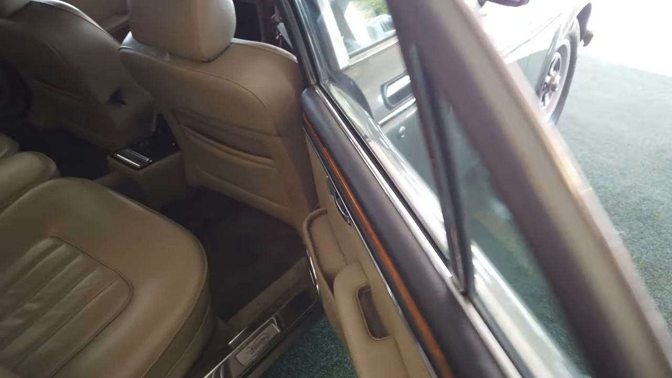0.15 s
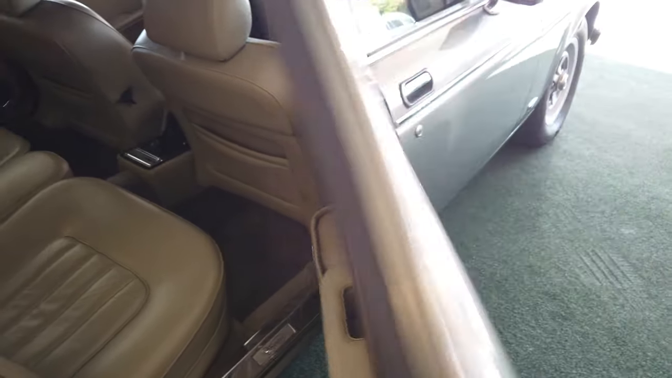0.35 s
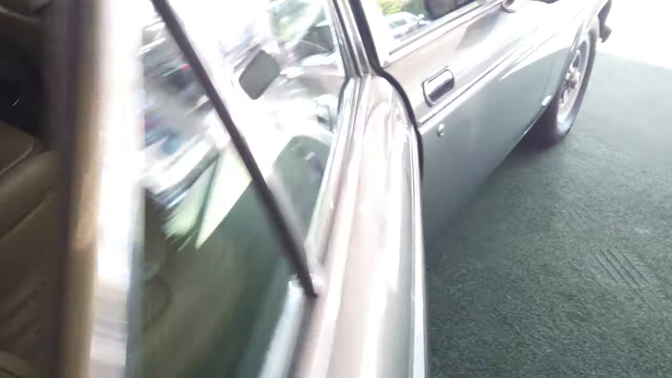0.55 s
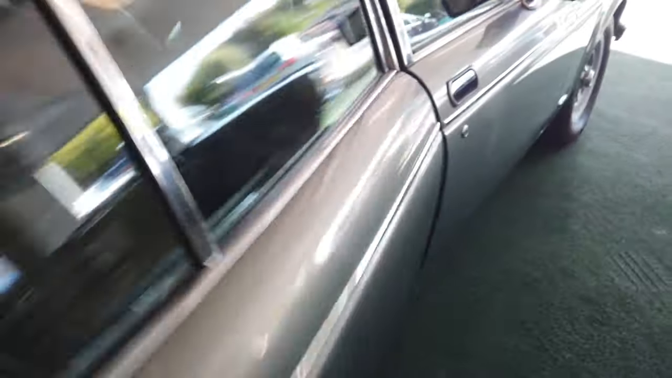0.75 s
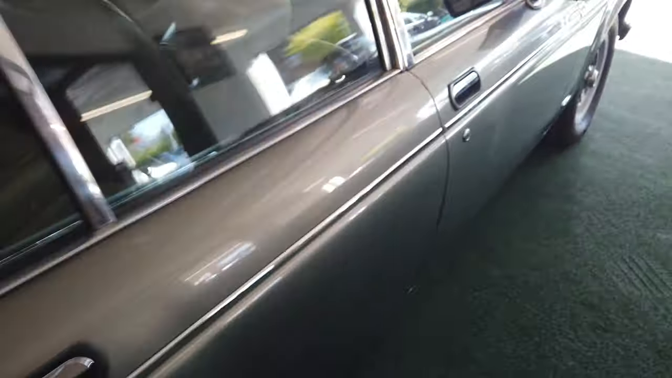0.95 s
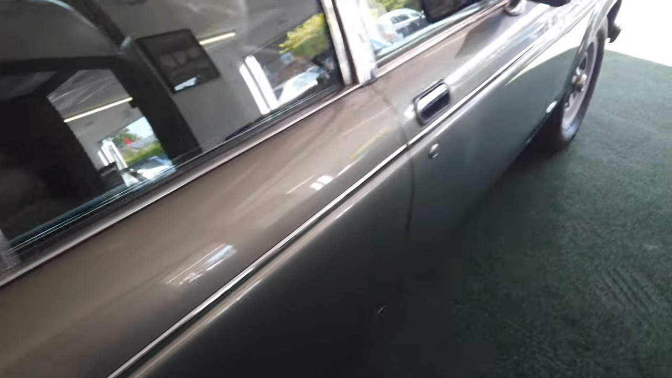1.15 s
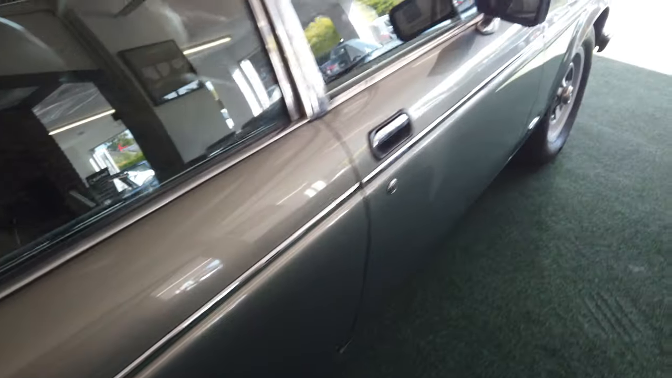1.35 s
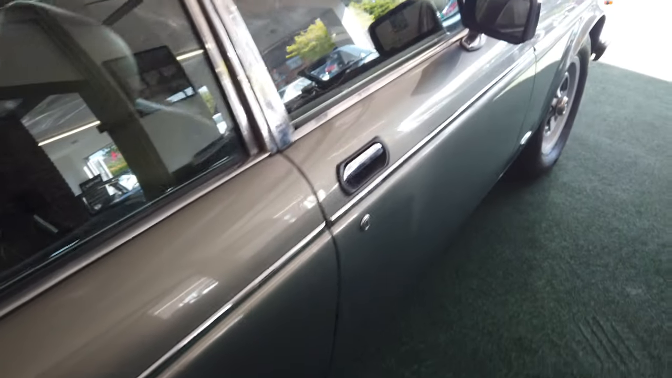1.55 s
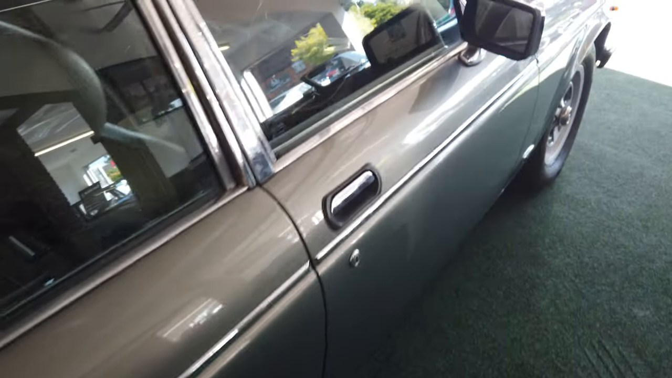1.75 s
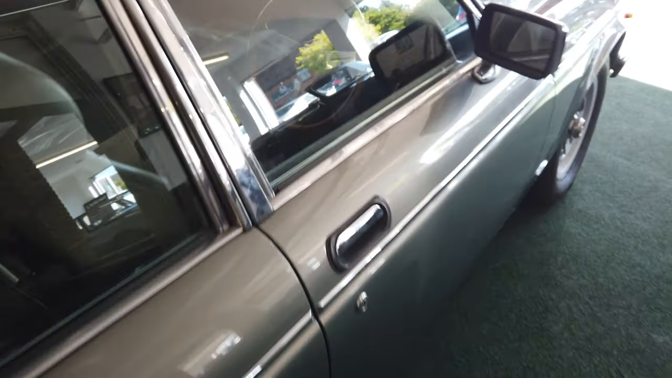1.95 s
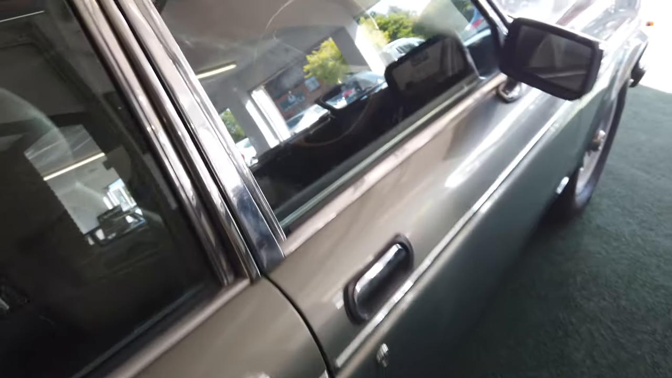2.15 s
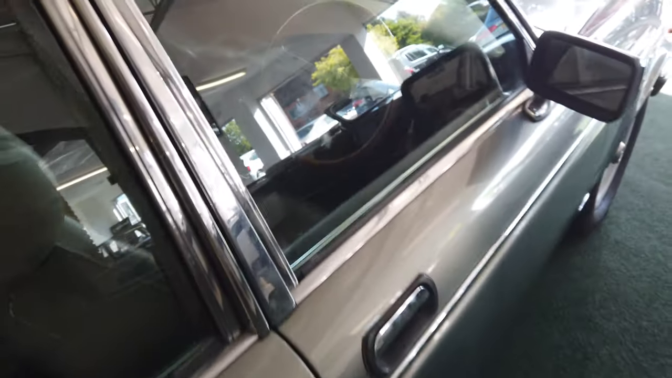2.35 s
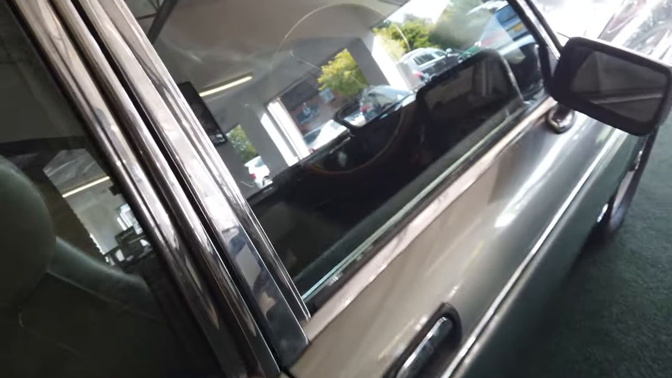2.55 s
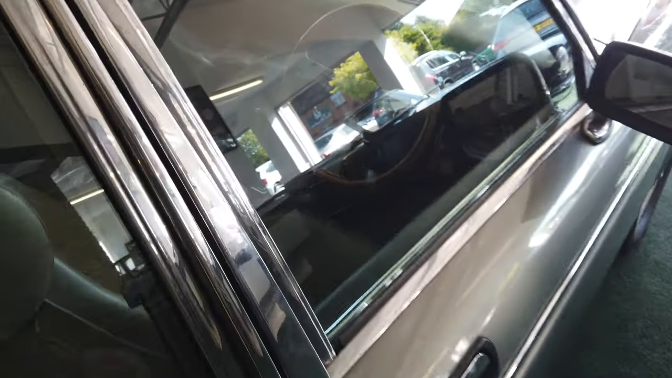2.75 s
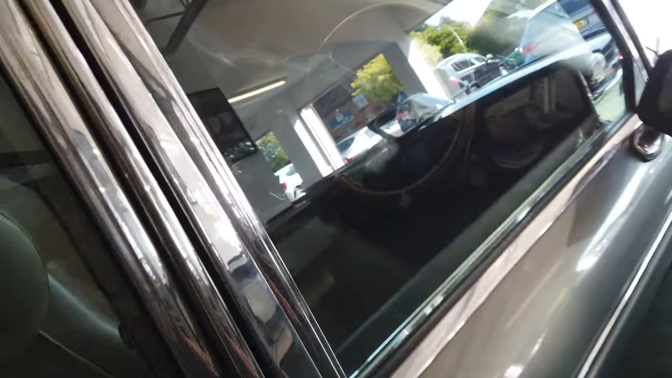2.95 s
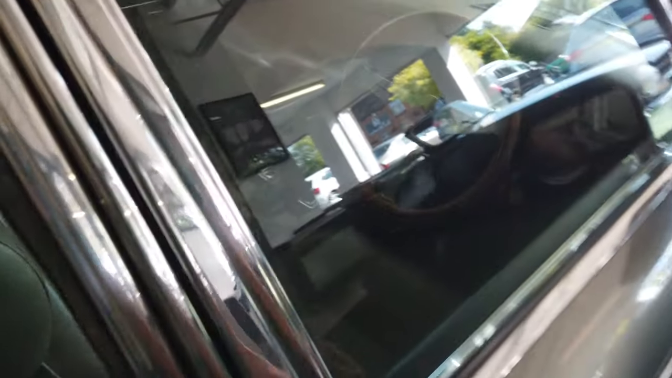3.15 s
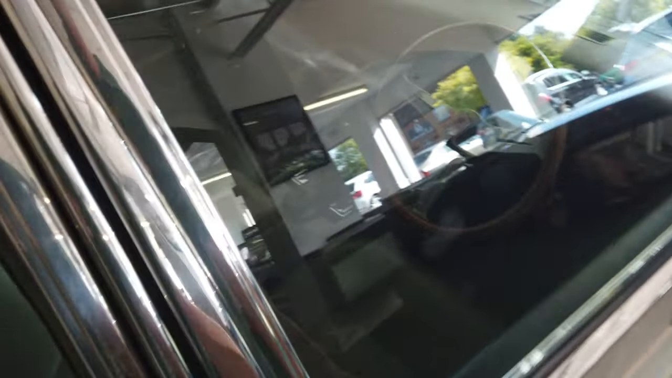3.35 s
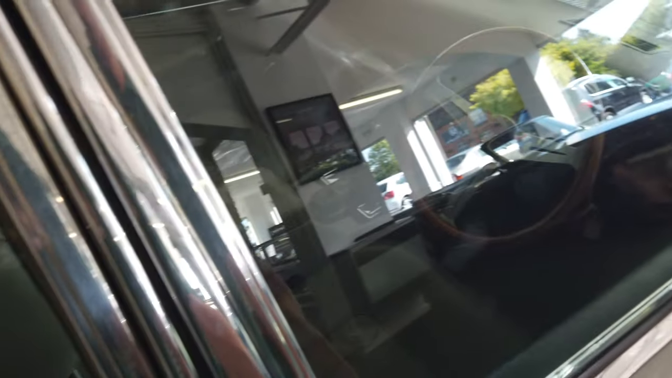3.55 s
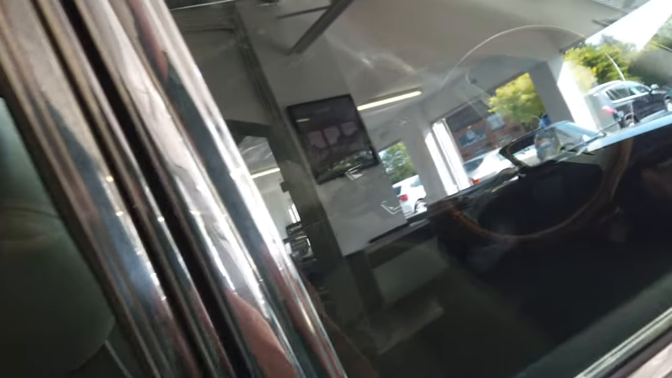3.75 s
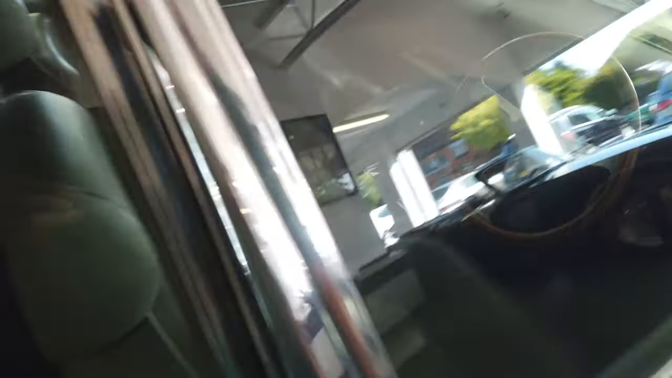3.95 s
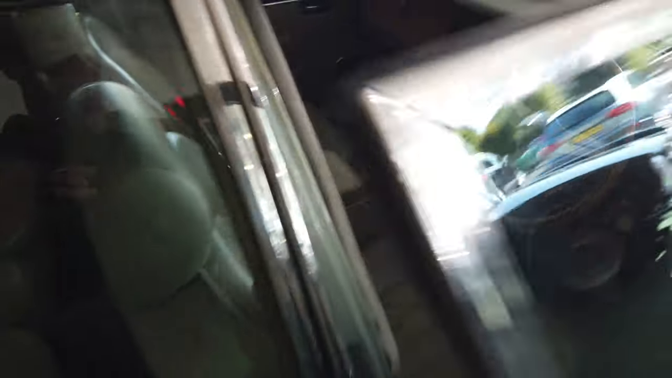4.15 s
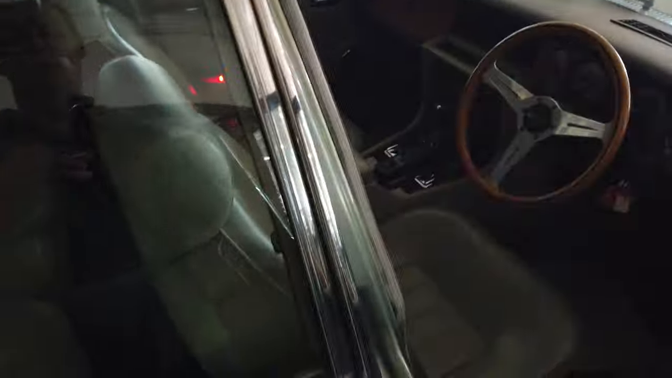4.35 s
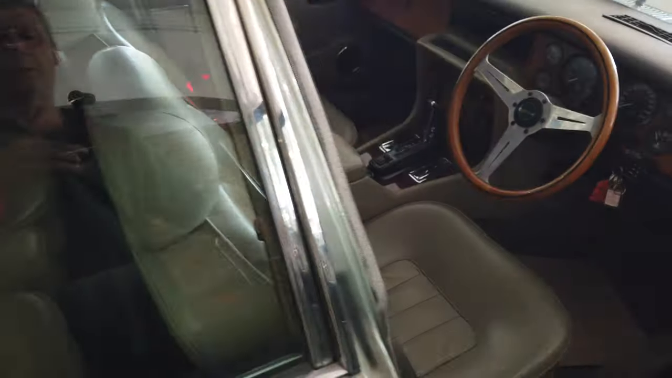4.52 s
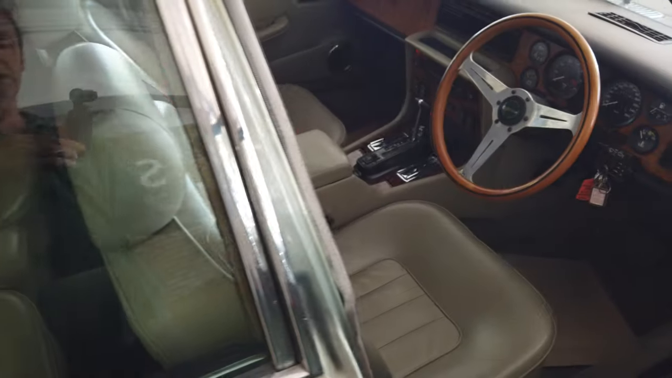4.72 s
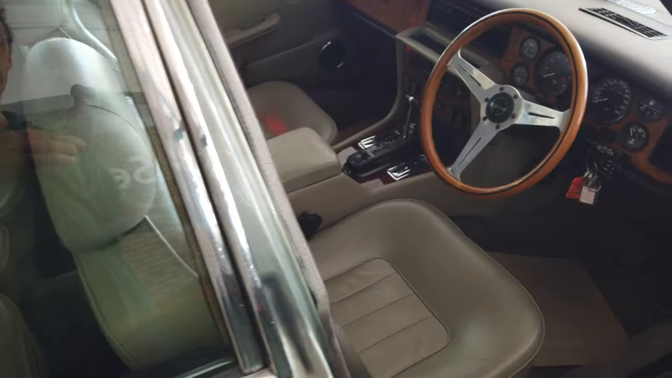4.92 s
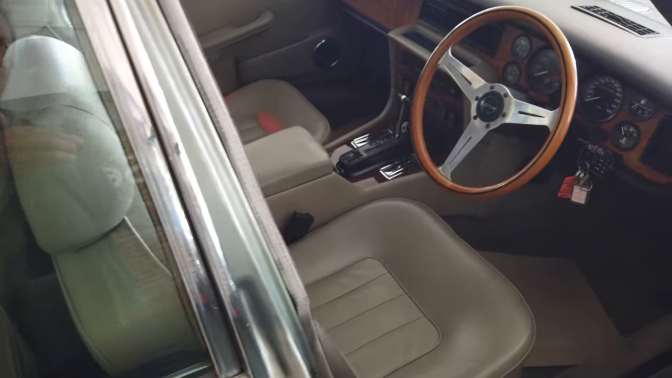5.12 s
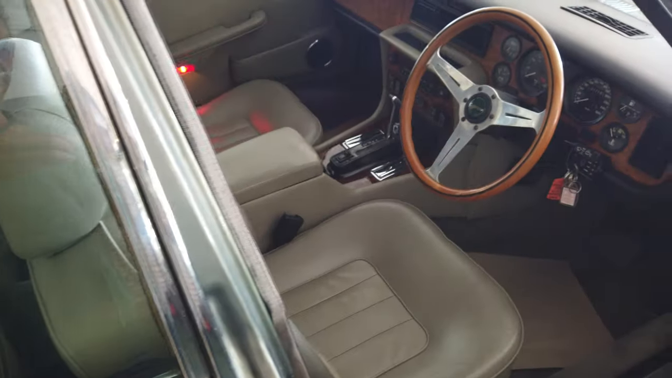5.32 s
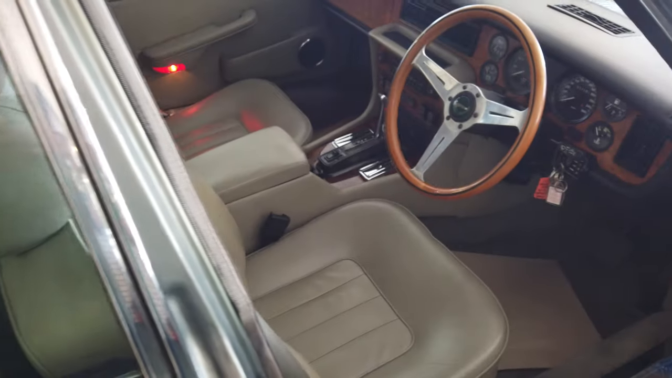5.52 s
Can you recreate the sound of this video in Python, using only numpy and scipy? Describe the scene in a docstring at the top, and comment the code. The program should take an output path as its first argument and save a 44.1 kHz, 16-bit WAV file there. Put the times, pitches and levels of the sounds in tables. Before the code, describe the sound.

A heavy old car door slams with a snap, deep thunk and singing steel, then a handle clicks and another door opens with a squeak and clunk.

```python
"""The heavy rear door of an old saloon car swings shut in a covered showroom: latch snaps, door lands on its seals,
cabin booms, steel rings on. The front handle is pulled, that latch springs free, and the door opens until its check
arm squeaks and drops into the notch; a sleeve rustles over ventilation and far traffic. Contacts are decaying noise
bursts coloured per part, with resonances for ringing metal; the boom is rounded pushes into decaying modes; friction
is filtered noise under swells. Shaped noise echoes make the room; small delays and ragged phase place the sources."""
import sys
import numpy as np
from scipy import signal
from scipy.fft import rfft, irfft, next_fast_len
from scipy.io import wavfile
from scipy.ndimage import uniform_filter1d

SR = 44100
rng = np.random.default_rng(int(sys.argv[2]) if len(sys.argv) > 2 else 0)


def transcribe(u):
    """Save the signal u as a 16-bit wav file named by the first command-line argument.

    u: samples, shape (n,) or (channels, n), limited to [-1, 1]; the rate is SR.
    q: integer samples, one column per channel.
    """
    v = np.clip(np.atleast_2d(u).T, -1, 1)
    q = np.round(v * 32767).astype(np.int16)
    wavfile.write(sys.argv[1], SR, q)


N = 246254
TIME = np.arange(N) / SR
BLOW_SIZE = 16384   # samples

# Hand, seal and the door's own weight meeting the body.
# Each row: time in seconds, push level in dB, contact time in seconds.
BUMPS = [(.634, -26, 0.0028), (.672, -24.5, 0.0041), (1.044, -22, 0.0069), (1.079, -5.5, 0.014),
         (1.121, -3, 0.01), (1.156, 4, 0.0031), (1.1702, -9, 0.003), (1.1927, -5, 0.0026),
         (3.662, -42, 0.002), (3.695, -32.5, 0.0025), (3.777, -16, 0.0052), (4.21, -19, 0.018),
         (4.568, -22.5, 0.014), (4.611, -29.5, 0.0043), (5.022, -27, .011), (5.07, -28.5, 0.0096)]


def from_db(db):
    """Decibels to gain."""
    return 10 ** (np.asarray(db) / 20)


def unit(x):
    """Scale to energy 1."""
    return x / np.sqrt(np.sum(x ** 2) + 1e-20)


def rms_one(x):
    """Scale to rms 1."""
    return x / np.sqrt(np.mean(x ** 2) + 1e-20)


def at_hz(points, hz):
    """Read a table on a log-frequency axis."""
    f, value = np.transpose(points)
    return np.interp(np.log(np.maximum(hz, 1)), np.log(f), value)


def fade(t, t60):
    """Free decay, 60 dB down after t60 seconds."""
    return np.exp(-np.log(1000) * t / max(t60, 1e-3))


def swell(start_s, db, attack_s, hold_s, t60):
    """Envelope: a smooth rise, a hold, a free decay."""
    t = TIME - start_s
    rise = np.sin(np.pi / 2 * np.clip(t / attack_s, 0, 1)) ** 2
    return from_db(db) * rise * fade(np.maximum(t - attack_s - hold_s, 0), t60)


def add(track, s, sound):
    """Mix a sound into a track at time s."""
    at = round(s * SR)
    track[at:at + len(sound)] += sound[:N - at]


def causal(gain):
    """Minimum-phase response with the given gain per frequency."""
    cepstrum = irfft(np.log(gain))
    half = len(cepstrum) // 2
    cepstrum[1:half] *= 2
    cepstrum[half + 1:] = 0
    return np.exp(rfft(cepstrum))


def colour(x, spectrum):
    """Minimum-phase filter from a table of (Hz, dB)."""
    size = 2 * next_fast_len(x.shape[-1] // 2 + 1)
    gain = from_db(at_hz(spectrum, np.fft.rfftfreq(size, 1 / SR)))
    return irfft(rfft(x, size) * causal(gain))[..., :x.shape[-1]]


def resonance(x, hz, width_hz):
    """Two-pole band-pass."""
    r = np.exp(-np.pi * width_hz / SR)
    return signal.lfilter([1, 0, -1], [1, -2 * r * np.cos(2 * np.pi * hz / SR), r * r], x)


def soften(x, dull_hz):
    """A soft contact loses its top: second-order low-pass."""
    return signal.sosfilt(signal.butter(2, min(dull_hz, SR / 2 - 1000), fs=SR, output="sos"), x)


def modes(table):
    """Response of a set of decaying modes to one blow."""
    t = TIME[:3 * SR]
    return sum(from_db(db) * np.sin(2 * np.pi * hz * t) * fade(t, t60) for hz, db, t60 in table)


def blow(t60, crack, rise_s=0.00053):
    """A contact, then the dense, quickly dying modes of a damped panel: a noise burst with its spectrum levelled."""
    t = TIME[:BLOW_SIZE]
    burst = unit(rng.standard_normal(BLOW_SIZE) * fade(t, t60) * (1 - np.exp(-t / rise_s)))
    burst[0] -= crack
    spectrum = rfft(burst)
    smooth_power = uniform_filter1d(np.abs(spectrum) ** 2, size=90)
    return irfft(spectrum * causal(smooth_power ** -.5))


def ping(hz, nominal_width_hz, t60, crack=0.09, skirt=1):
    """A blow heard through one resonance; a wider skirt lets it speak at once; energy 1."""
    narrow = resonance(blow(t60, crack), hz, 0.68 * nominal_width_hz)
    return unit(resonance(narrow, hz, 0.68 * skirt * nominal_width_hz))


def with_ring(hits, t60, drag=0):
    """Give each hit its ring time: t60 for the hardest, longer for lighter ones by drag dB per dB of softness."""
    db = np.array(hits)[:, 1]
    return np.c_[hits, t60 * from_db(drag * (db.max() - db))]


def strikes(hits, part, crack, ripple_db=1.0):
    """Blows on one part share its colour and fine treble resonances; softer contacts lose their top."""
    out = np.zeros(N)
    hz = np.geomspace(20, 16000, num=1400)
    ripple = ripple_db * rng.standard_normal(len(hz)) * np.minimum(hz / 4000, 1)
    resonant = np.c_[hz, at_hz(part, hz) + ripple]
    for s, db, dull_hz, t60 in hits:
        struck = colour(blow(t60, crack), resonant)
        add(out, s, from_db(db) * unit(soften(struck, dull_hz)))
    return out


def ringing(hits, rings, skirt=4):
    """Every blow on a part sets its main modes ringing."""
    out = np.zeros(N)
    for s, db, dull_hz, *_ in hits:
        ring = sum(from_db(mode_db) * ping(hz, width_hz, t60, crack=0.22, skirt=skirt)
                   for hz, mode_db, width_hz, t60 in rings)
        add(out, s, from_db(db) * soften(ring, dull_hz))
    return out


def partials(table, flutter_hz=7, steady=0.51, start_s=0):
    """Steel partials: steady sines plus narrow noise, each fluttering on its own; sines in step at start_s."""
    out = 0
    for hz, db in table:
        narrow = resonance(rng.standard_normal(N), hz, 2 * flutter_hz)
        flutter = rms_one(resonance(narrow, hz, 8 * flutter_hz))
        tone = steady * np.sin(2 * np.pi * hz * (TIME - start_s))
        out = out + from_db(db) * rms_one(flutter + tone)
    return out


def grain(level_db, size):
    """Uneven friction: random gain, smoothed over size samples, with level_db rms variation."""
    return from_db(level_db * rms_one(uniform_filter1d(rng.standard_normal(N), size=size)))


def diffuse(size, widths):
    """Noise from all around: the table of (Hz, side-mid dB) sets how far the microphones differ."""
    mid, side = rng.standard_normal((2, size))
    width = from_db(at_hz(widths, np.fft.rfftfreq(size, 1 / SR)))
    return irfft((rfft(mid) + rfft(side) * width * [[1], [-1]]) / np.sqrt(1 + width ** 2), size)


def background():
    """Ventilation and far traffic as shaped noise with a low drone and faint fan tones; the level sways slowly."""
    # Each row: Hz, dB.
    air_colour = [(20, 0), (34, -6.5), (50, 1.5), (75, -7.5), (110, -16), (200, -19.5), (400, -28.5),
                  (800, -29), (1600, -30), (3200, -36), (6400, -44), (11500, -45), (15000, -57)]
    # Each row: Hz, side-mid level in dB.
    air_width = [(60, -18.5), (250, -12.5), (550, -8.5), (1050, -4.5), (1750, -3.5), (2700, 0.5)]
    # Fan tones. Each row: Hz, width in Hz, rms in dB before the sway.
    fan_tones = [(52.5, 2.1, -63.5), (308, 2.4, -86.5), (421, 5.4, -85.5), (495, 4.8, -85)]
    # Each row: time in seconds, level change in dB.
    air_sway = [(0, 0.5), (1, 2), (2.5, -2.5), (3.1, -1), (5.2, -0.5)]
    air = from_db(-62.5) * rms_one(colour(diffuse(next_fast_len(N), air_width), air_colour))[:, :N]
    hum = sum(from_db(db) * rms_one(resonance(rng.standard_normal(N + SR), hz, width_hz)[SR:])
              for hz, width_hz, db in fan_tones)
    return (air + hum) * from_db(np.interp(TIME, *np.transpose(air_sway)))


def rub():
    """Rubber, hinge and sleeve: grainy friction that swells and fades with each movement."""
    # Each row: start in seconds, level in dB, swell, hold and t60 in seconds.
    strokes = [(0.43, -69, 0.36, 0.11, 0.38), (1.056, -47.5, 0.046, 0.0025, 0.034),
               (2.46, -78.5, .06, 0.027, 0.33), (2.998, -78, 0.048, .03, .35), (3.198, -65.5, 0.2, 0.08, 1),
               (4.128, -67, 0.12, 0.051, 0.32), (5.338, -68.5, 0.14, 0.049, 0.42)]
    # Each row: Hz, dB.
    rub_colour = [(200, -5.5), (600, 5), (1000, -1), (1600, 3.5), (2600, -8.5), (4500, -11), (8000, -14),
                  (11500, -14.5), (15000, -19.5)]
    grains = grain(3, size=150)
    friction = rms_one(colour(rng.standard_normal(N) * grains, rub_colour))
    return sum(swell(*stroke) for stroke in strokes) * friction


def slips():
    """Steel slides for an instant in latch and hinge: thin chirps and scrapes of grainy noise in one resonance."""
    # Each row: start in seconds, level in dB, swell, hold and t60 in seconds, centre in Hz,
    # width in Hz of each of two filter passes.
    slides = [(.56, -70.5, 0.096, 0.16, .4, 1480, 700), (1.259, -52, .006, .014, 0.11, 11440, 1000),
              (1.393, -60, 0.0093, 0.013, 0.14, 11660, 2600), (1.52, -70, 0.0072, 0.024, .15, 11500, 1823),
              (3.66, -61.5, .025, .1, 0.11, 414, 600), (4.433, -51.5, 0.0088, .002, 0.029, 10940, 900),
              (4.44, -61, 0.0044, .005, 0.041, 4150, 1700), (4.473, -68, .01, 0.014, 0.055, 10100, 1500),
              (4.474, -61, 0.022, 0.0042, 0.11, 2010, 1100), (4.581, -58, .003, .006, 0.087, 11000, 1200),
              (4.55, -66, 0.059, 0.066, .15, 2900, 1500), (4.582, -49.5, 0.0045, 0.0062, 0.038, 3000, 2940),
              (4.584, -56, .003, 0.0057, .06, 6730, 700)]
    out = 0
    grains = grain(4.5, size=50)
    for *stroke, hz, width_hz in slides:
        narrow = resonance(grains * rng.standard_normal(N), hz, width_hz)
        out = out + swell(*stroke) * rms_one(resonance(narrow, hz, width_hz))
    return out


def ticks():
    """Fingers, handle, rods and hinge: each small part clicks in a broad resonance of its own."""
    # Each row: time in seconds, energy in dB, centre in Hz, nominal width in Hz, burst t60 in seconds.
    taps = [(.634, -34.5, 474, 400, 0.054), (2.94, -46.5, 3024, 2494, .05), (3.435, -41, 1790, 1200, .008),
            (3.443, -36, 1500, 1300, 0.007), (3.496, -37, 1450, 1100, .006),
            (3.524, -41.5, 1600, 1100, 0.0083), (3.542, -38, 1190, 1300, .009),
            (3.689, -40.5, 3500, 2500, 0.025), (3.69, -29.5, 1650, 500, 0.023),
            (3.7427, -29, 750, 900, 0.067), (4.264, -30, 474, 396, 0.036),
            (4.4905, -26.5, 1980, 1600, .005), (4.49, -46, 5000, 3000, .01),
            (4.4903, -37, 10700, 2500, .008), (4.567, -44, 6000, 7000, 0.0044),
            (4.5808, -31, 2800, 4000, 0.004)]
    out = np.zeros(N)
    for s, db, hz, width_hz, t60 in taps:
        add(out, s, from_db(db) * ping(hz, width_hz, t60, crack=0.37))
    return out


def handle():
    """The handle takes up its slack and the rod behind it bounces, each hit exciting the same modes."""
    # Each row: time in seconds, level in dB, dull above Hz.
    handle_hits = [(3.352, -33, 12000), (3.3595, -36.5, 5000), (3.367, -28.5, 1100), (3.3745, -34, 4000),
                   (3.383, -31.5, 800), (3.393, -32.5, 800)]
    # Each row: Hz, dB re blow, nominal width in Hz, burst t60 in seconds.
    handle_modes = [(128, -2.5, 35, .03), (258, 1, 40, 0.011), (365, 0, 136, 0.016), (1500, -7, 1500, .01),
                    (2260, -8, 60, 0.0071), (3770, -10, 100, 0.0089), (3400, -10, 2660, .012),
                    (7250, -18, 200, .008)]
    return ringing(handle_hits, handle_modes)


def squeak(jitter=0.045, overtone_db=-15):
    """Dry slip of the check arm, fast stick and slip: a short, unsteady tone with its octave."""
    waver = 1 + jitter * rms_one(uniform_filter1d(rng.standard_normal(N), size=40))
    phase = 2 * np.pi * np.cumsum(1413 * waver) / SR   # mean pitch in Hz
    level = swell(4.685, -36.5, attack_s=0.0059, hold_s=0.0056, t60=0.044)
    return level * rms_one(np.sin(phase) + from_db(overtone_db) * np.sin(2 * phase))


def thud():
    """The skin of the front door swings in a few low modes as the arm lands."""
    # Each row: Hz, dB, t60 in seconds.
    thud_modes = [(123.6, -30, 0.16), (200.6, -42, 0.22), (251.3, -33, 0.12), (310.6, -35.5, 0.19)]
    out = np.zeros(N)
    add(out, 4.7095, modes(thud_modes))
    return out


def check_arm():
    """The arm slides, drops into its notch and chatters there; lighter touches last longer."""
    # Each row: time in seconds, level in dB, dull above Hz.
    stay_hits = [(4.544, -23.5, 2600), (4.581, -19, 5000), (4.667, -21, 13000), (4.7045, -4.5, 15200),
                 (4.712, -10.5, 4000), (4.7155, -9.5, 4930), (4.7215, -8, 1690), (4.7275, -8, 1900),
                 (4.736, -13.5, 1300)]
    # Each row: Hz, dB.
    stay_colour = [(25, -39), (70, -4), (125, 2.5), (180, -1), (260, -1), (400, -2.5), (850, -4.5),
                   (1150, -7.5), (1500, -4), (1780, -4.5), (2150, -10), (2800, -11.5), (4500, -14.5),
                   (8000, -20), (11000, -19), (15000, -30)]
    # Each row: Hz, dB re blow, nominal width in Hz, burst t60 in seconds.
    stay_modes = [(916, -19, 29, .03), (1478, -12.5, 160, 0.05), (1760, -20, 78, 0.021),
                  (1912, -20, 50, .03), (2790, -14, 450, 0.15)]
    contacts = strikes(with_ring(stay_hits, t60=0.031, drag=0.91), stay_colour, crack=0.42)
    return contacts + ringing(stay_hits, stay_modes) + thud() + squeak()


def front_latch():
    """The front latch springs free: its blows, and apart from them the modes they set ringing."""
    # Each row: time in seconds, level in dB, dull above Hz.
    release_hits = [(3.689, -33, 3460), (3.768, -24, 1600), (3.805, -2, 15200), (3.8105, -1, 14130),
                    (3.841, -9, 10900)]
    # Each row: Hz, dB.
    release_colour = [(25, -44), (70, -9), (150, -1.5), (280, -.5), (430, 1), (530, -4), (640, -7.5),
                      (770, -6), (1100, -5.5), (1420, -7), (2050, -9), (3000, -11), (3900, -10.5),
                      (4800, -22), (7500, -24), (10800, -26), (14500, -33)]
    # Each row: Hz, dB re blow, nominal width in Hz, burst t60 in seconds.
    release_modes = [(164, -14.5, 77, 0.14), (273.2, -11, 23, 0.06), (645, -9, 35, 0.019),
                     (996, -8.5, 140, 0.019), (1120, -5, 90, 0.014), (1730, -18, 90, .03),
                     (2060, -14, 77, 0.035), (2740, -19, 60, .03), (3027, -10.5, 64, .03),
                     (3800, -18, 200, .05), (4012, -21, 60, 0.033), (10650, -12.5, 1700, 0.014)]
    blows = strikes(with_ring(release_hits, t60=0.04), release_colour, crack=0.34)
    return blows, ringing(release_hits, release_modes)


def spring():
    """A spring in the door sings in three surges of close, beating partials until it comes to rest."""
    # Each row: start in seconds, level in dB, swell, hold and t60 in seconds.
    surges = [(1.16, -53, .02, .15, .6), (1.436, -52, .012, .03, 1.5), (1.96, -73.5, .05, .13, .45)]
    # Each row: Hz, dB.
    singing = [(1672, -1), (1658, -10), (1733, -11.5)]
    stop_s, stop_t60_s = 2.22, .25
    level = sum(swell(*surge) for surge in surges) * fade(np.maximum(TIME - stop_s, 0), stop_t60_s)
    return level * partials(singing, flutter_hz=9.9, steady=1.2, start_s=1.48)


def steel_ring():
    """Loose steel trembles after the slam: partials jingle over a fine rattle that comes in two waves."""
    # One swell: start in seconds, level in dB, swell, hold and t60 in seconds.
    jingle = (1.46, -62.5, 0.1552, 0.3758, 0.83)
    # Springs and steel trim. Each row: Hz, dB.
    steel_partials = [(570.6, -9), (716, -14), (890, -17), (1120, -17), (1260, -15), (1534, -13),
                      (2050, -16), (2347, -21), (2875, -21), (3187, -23), (3792, -23), (4183, -27),
                      (4683, -27), (7257, -32)]
    # Each row: start in seconds, level in dB, swell, hold and t60 in seconds.
    rattle_waves = [(1.5, -66, 0.13, 0.14, 0.86), (1.865, -65.5, 0.032, 0.023, 0.6)]
    # Each row: Hz, dB.
    rattle_colour = [(200, -11), (560, 1), (900, 2), (1800, -1), (2600, -21), (5000, -27), (11000, -19),
                     (15000, -32.5)]
    rattle = rms_one(colour(rng.standard_normal(N) ** 3, rattle_colour))   # cubing makes it spiky
    return swell(*jingle) * partials(steel_partials) + sum(swell(*wave) for wave in rattle_waves) * rattle


def boom():
    """Each bump is a rounded push that swings cabin air and door shell in a few strong modes and a crowd of lesser."""
    # Cabin air and door shell. Each row: Hz, dB, t60 in seconds.
    shell = [(22.5, -36, 1.1), (47.75, -24, 0.77), (63, -26.5, .25), (88.84, -18.5, 0.35),
             (117.87, -36.5, 1.3), (139, -32.5, 0.2), (167.5, -27.5, 0.26), (234, -23.5, 0.23),
             (276, -23.5, 0.17), (313, -28, 0.15), (466, -34.5, .2)]
    # Crowded lesser modes of cabin and trim. Each row: Hz, dB.
    bloom_colour = [(32, -21.5), (60, -4.5), (110, -2), (170, -2), (270, -1), (420, -15.5), (900, -40.5)]
    bloom_db, bloom_t60_s = 0.5, .2
    force = np.zeros(N)
    for s, db, contact_s in BUMPS:
        push = np.sin(np.pi * np.minimum(TIME[:BLOW_SIZE] / contact_s, 1))
        add(force, s, -from_db(db) * push / push.sum())
    body = modes(shell)
    crowd = colour(rng.standard_normal(SR) * fade(TIME[:SR], bloom_t60_s), bloom_colour)
    add(body, 0, from_db(bloom_db) * unit(crowd))
    return signal.fftconvolve(force, body)[:N]


def knocks():
    """Each bump knocks on the padded door: longer contacts weaker and duller, lighter knocks longer."""
    # Each row: Hz, dB.
    padded = [(30, -9.5), (90, -2.5), (160, 1), (250, 0), (450, -8), (700, -17), (1500, -11), (4000, -26.5)]
    s, db, contact_s = np.transpose(BUMPS)
    softness = contact_s / 0.0036
    knock_db = db + 4.5 - 10 * np.log2(softness)   # 10 dB lost per doubling of contact time
    hits = np.c_[s, knock_db, 625 / np.sqrt(softness)]
    return strikes(with_ring(hits, t60=0.069, drag=0.28), padded, crack=0.58)


def shakes(count=4):
    """Hits of loose parts as the door lands: gaps widen, strength falls, and smaller, brighter parts shake last."""
    start_s, start_db, fall_db_per_s = 1.157, -0.5, 70
    first_gap_s, gap_growth, ring_gaps = .018, 1.7, 7   # t60 is ring_gaps times the gap
    dull_start_hz, brightening = 4100, 1.174
    gaps = first_gap_s * gap_growth ** np.arange(count)
    after = np.cumsum(gaps) - gaps
    dull_hz = dull_start_hz * brightening ** np.arange(count)
    return np.c_[start_s + after, start_db - fall_db_per_s * after, dull_hz, ring_gaps * gaps]


def rear_latch():
    """The rear latch rides over its striker and seats; loose parts shake and the latch modes ring."""
    # Each row: time in seconds, level in dB, dull above Hz, burst t60 in seconds.
    latch_hits = [(1.027, -14, 2300, 0.052), (1.108, -3, 14900, 0.043), (1.1205, -4.5, 14680, .04),
                  (1.124, 3.5, 11000, .022), (1.133, 0, 14930, 0.095), (1.175, -5, 4200, .04)]
    # Each row: Hz, dB.
    latch_colour = [(60, -7.5), (130, -5), (230, -5), (360, -4.5), (470, -1.5), (800, -5.5), (1400, -7.5),
                    (2000, -5), (2750, -11.5), (3700, -14), (5200, -21.5), (8300, -16), (11000, -18.5),
                    (15000, -22)]
    # Each row: Hz, dB re blow, nominal width in Hz, burst t60 in seconds.
    latch_modes = [(446, -12, 60, .04), (2070, -15.5, 240, 0.045), (2850, -12.5, 700, .12),
                   (3420, -16.5, 900, 0.18)]
    contacts = strikes(np.vstack([latch_hits, shakes()]), latch_colour, crack=0.41)
    return contacts + ringing(latch_hits, latch_modes)


def from_right(x, lag_ms, scatter=2.2, patch_hz=220):
    """Sound reaches the left microphone a little later; wide panels make that lag ragged in the treble."""
    size = 2 * next_fast_len(N // 2 + 1)
    hz = np.fft.rfftfreq(size, 1 / SR)
    knots = rng.standard_normal(200)
    treble = np.clip((hz - 1200) / 1000, 0, 1)
    ragged = scatter * treble * np.interp(hz / patch_hz, np.arange(len(knots)), knots) / 2   # radians
    lag = 2 * np.pi * hz * lag_ms / 1000
    return irfft(rfft(x, size) * np.exp(1j * np.array([ragged - lag, -ragged])))[:, :N]


def showroom(x, build_s=0.0035, late_db=-24, late_stretch=0.93, near_db=-9, near_t60=0.3):
    """Flank and floor scatter at once; the room builds up and dies by band, with a faint, slightly shorter tail."""
    # Each row: Hz, t60 in seconds.
    room_t60 = [(40, 1), (120, 0.87), (300, 0.71), (800, 0.83), (1600, 0.68), (3200, 0.67), (6000, 0.31),
                (13000, 0.28)]
    # Each row: Hz, dB re the sound sent into the room.
    room_db = [(40, -8.5), (120, -8.5), (300, -4), (800, -0.5), (1600, -3.5), (3200, -4.5), (6000, -2.5),
               (13000, -3)]
    # Each row: Hz, side-mid level in dB.
    room_width = [(60, -39.5), (125, -32.5), (250, -21.5), (500, -17.5), (1000, -13), (2000, -4),
                  (4000, 1.5), (13000, -1.5)]
    size = 2 * SR
    t, hz = TIME[:size], np.fft.rfftfreq(size, 1 / SR)
    noise, response = rfft(diffuse(size, room_width)), 0
    near = from_db(near_db) * unit(fade(t, near_t60))
    build_up = 1 - np.exp(-(t / build_s) ** 2)
    centres = np.geomspace(40, 14000, num=16)
    for centre, own in zip(centres, np.eye(len(centres))):
        band = at_hz(np.c_[centres, own], hz)
        t60 = at_hz(room_t60, centre)
        tail = (fade(t, t60) + from_db(late_db) * fade(t, late_stretch * t60)) * build_up
        echoes = unit(irfft(noise * band, size) * np.hypot(unit(tail), near))
        share = np.sqrt(2 * np.mean(band ** 2))   # a band's energy goes with its width
        response = response + echoes * share * from_db(at_hz(room_db, centre))
    return signal.fftconvolve(x[None], response, axes=1)[:, :N]


def scene(tick_room_db=-11, stay_room_db=1, mode_room_db=-5, steel_room_db=-3):
    """Both doors, heard from close by; the small parts are nearest and stir the room least."""
    slam = rear_latch() + knocks() + boom()
    steel = spring() + steel_ring()
    release, release_ring = front_latch()
    release = release + rub()
    stay = check_arm()
    clicks = ticks() + handle() + slips()
    direct = (from_right(slam, lag_ms=0.085) + from_right(steel, lag_ms=0.036, scatter=0.9)
              + from_right(release + release_ring + clicks, lag_ms=0.072) + from_right(stay, lag_ms=0.084))
    small_parts = (from_db(tick_room_db) * clicks + from_db(mode_room_db) * release_ring
                   + from_db(steel_room_db) * steel)
    room = showroom(slam + release + from_db(stay_room_db) * stay + small_parts)
    return direct + room + background()


def record(dry):
    """The microphone drops the deepest bass; the top is cut steeply above 15.8 kHz."""
    lean = signal.sosfilt(signal.butter(2, 16, "high", fs=SR, output="sos"), dry)
    return signal.sosfilt(signal.ellip(10, .2, 80, 15800, fs=SR, output="sos"), lean)


dry = scene()
out = record(dry)
transcribe(out)
```